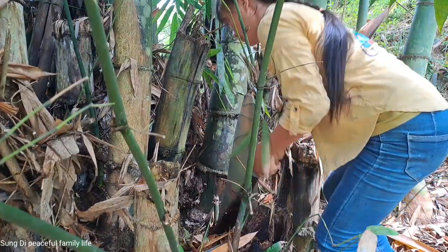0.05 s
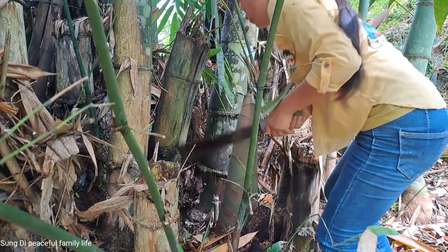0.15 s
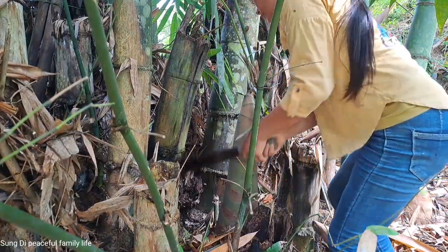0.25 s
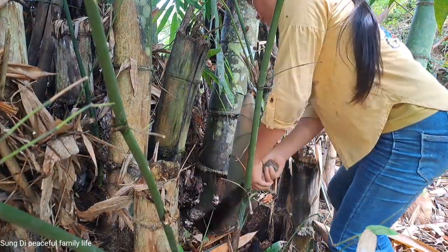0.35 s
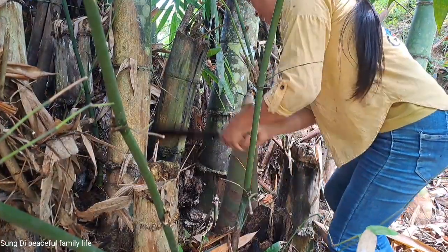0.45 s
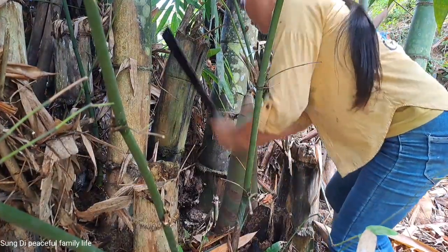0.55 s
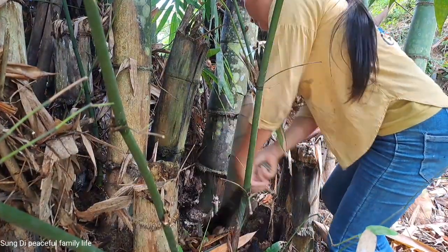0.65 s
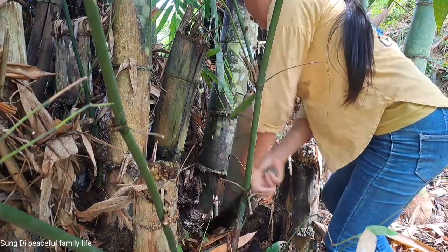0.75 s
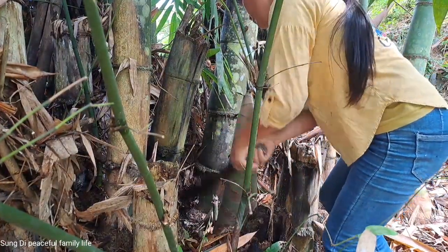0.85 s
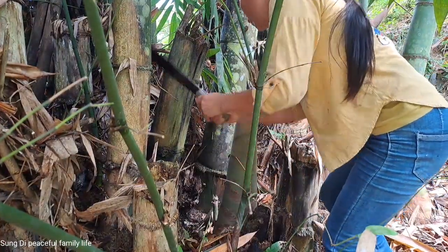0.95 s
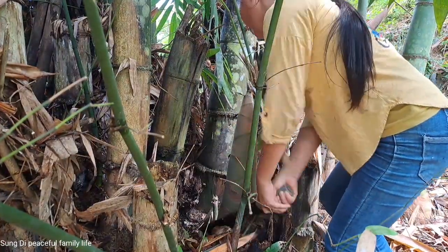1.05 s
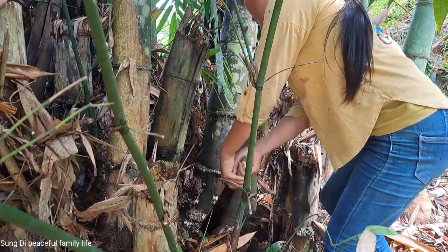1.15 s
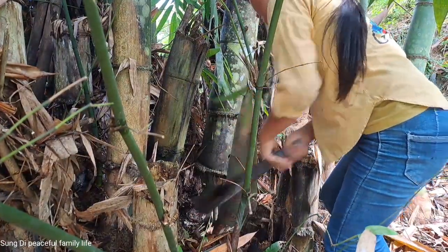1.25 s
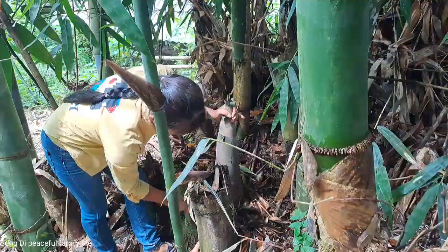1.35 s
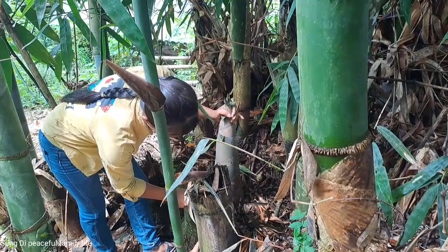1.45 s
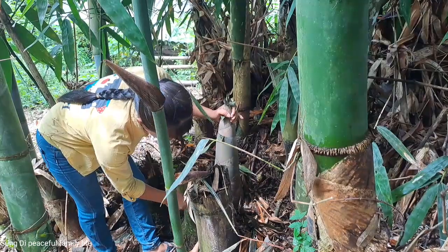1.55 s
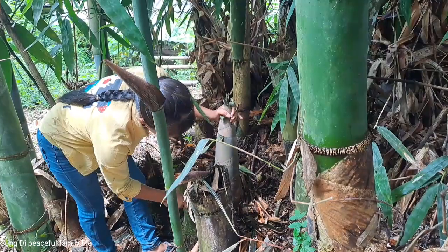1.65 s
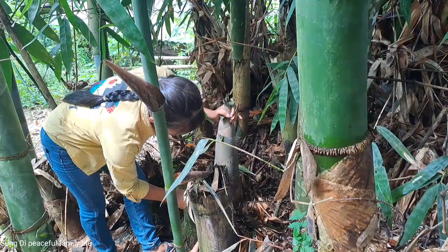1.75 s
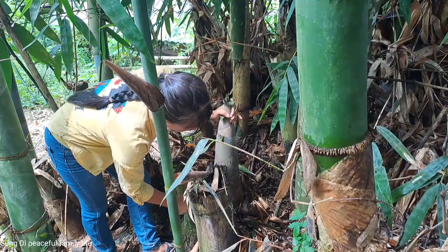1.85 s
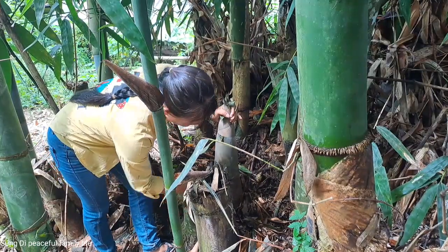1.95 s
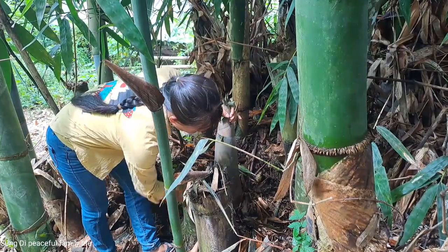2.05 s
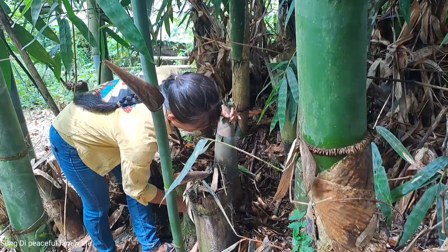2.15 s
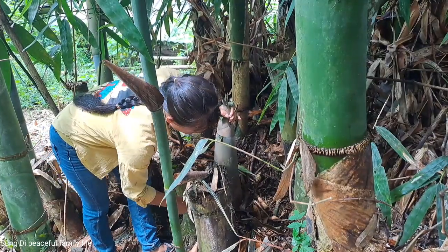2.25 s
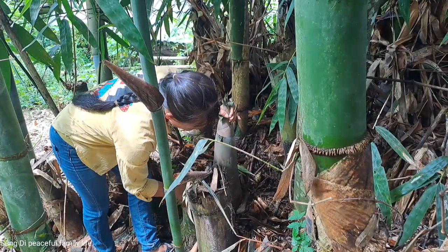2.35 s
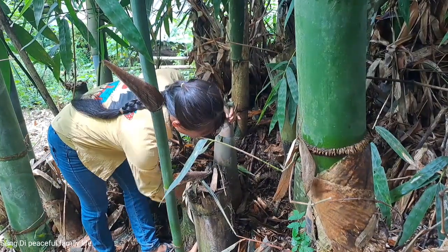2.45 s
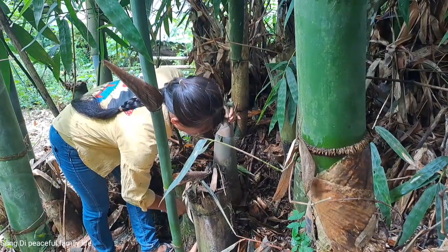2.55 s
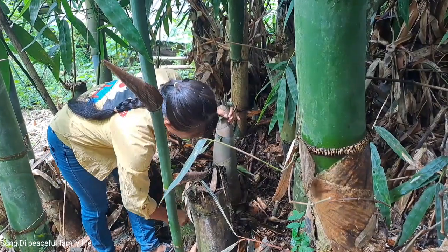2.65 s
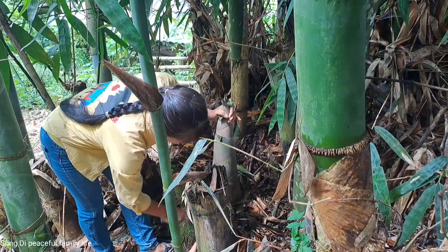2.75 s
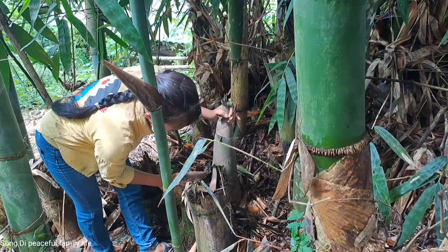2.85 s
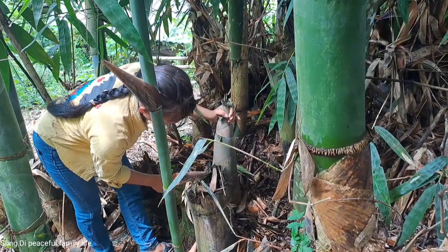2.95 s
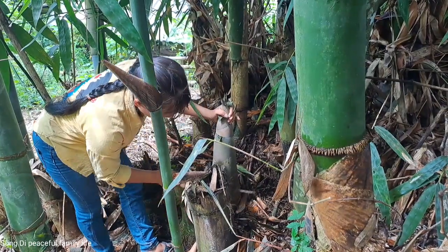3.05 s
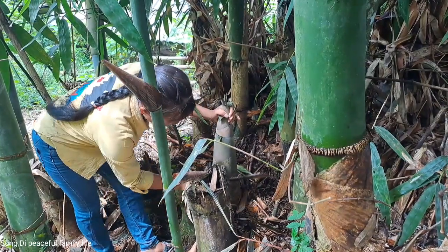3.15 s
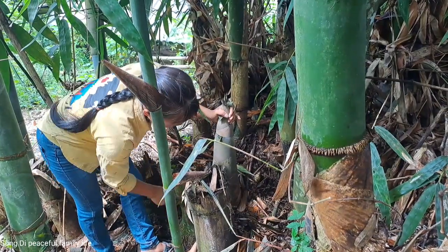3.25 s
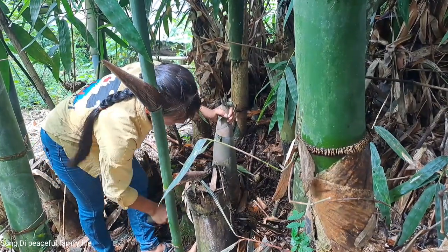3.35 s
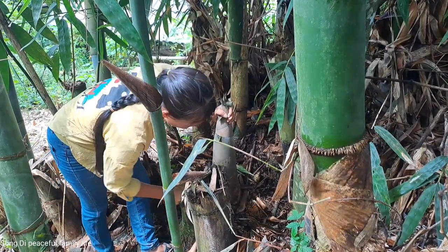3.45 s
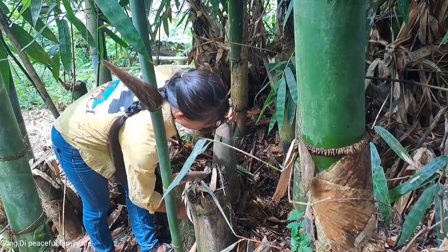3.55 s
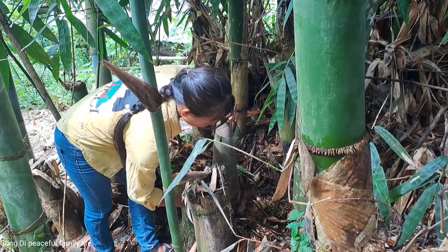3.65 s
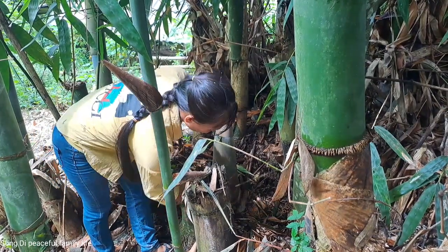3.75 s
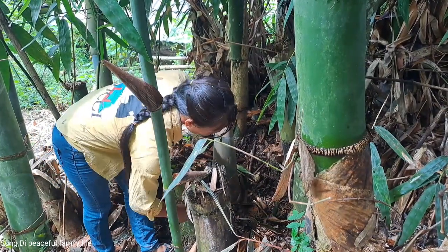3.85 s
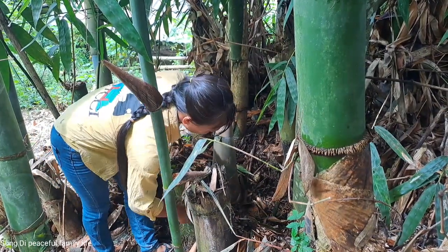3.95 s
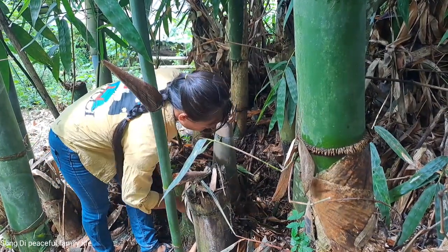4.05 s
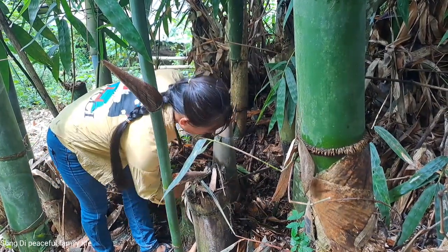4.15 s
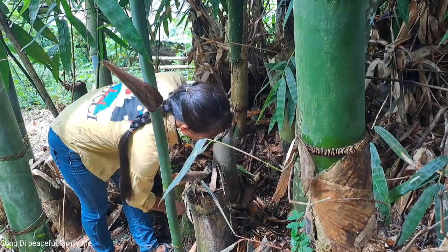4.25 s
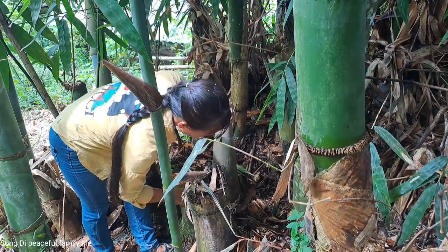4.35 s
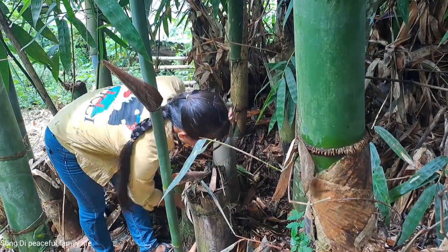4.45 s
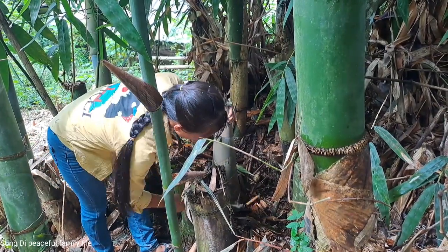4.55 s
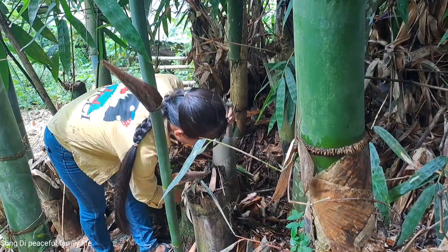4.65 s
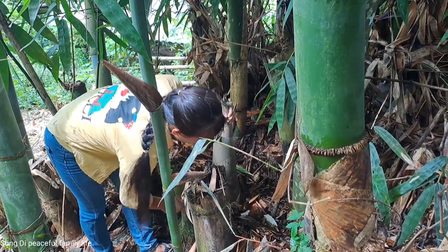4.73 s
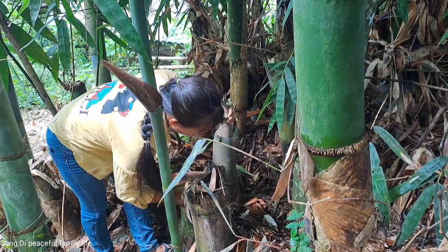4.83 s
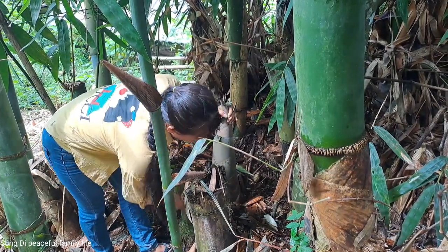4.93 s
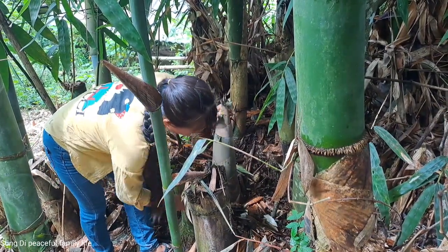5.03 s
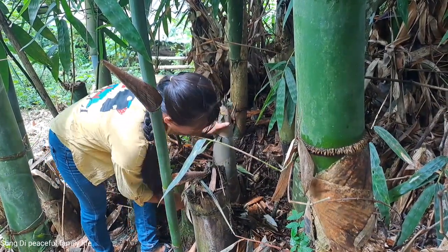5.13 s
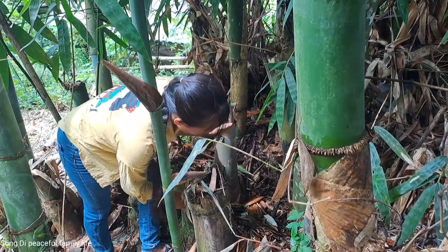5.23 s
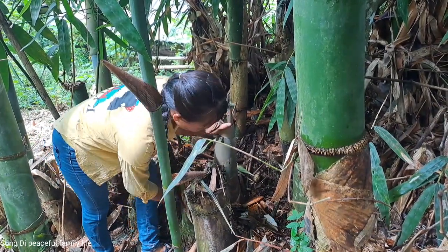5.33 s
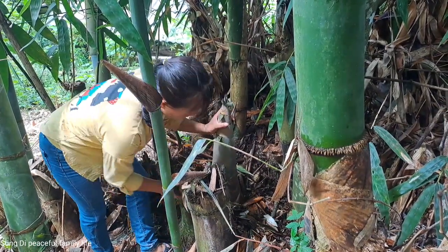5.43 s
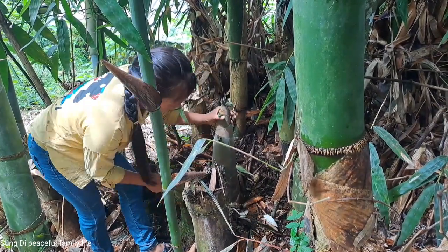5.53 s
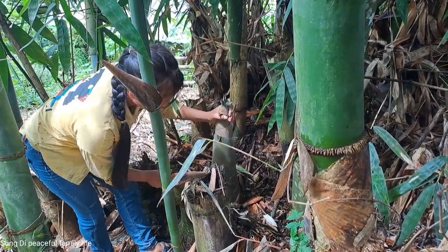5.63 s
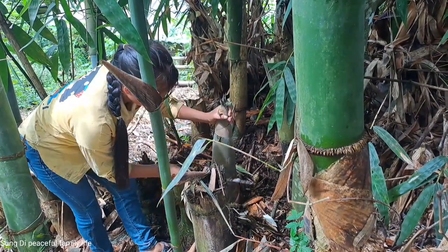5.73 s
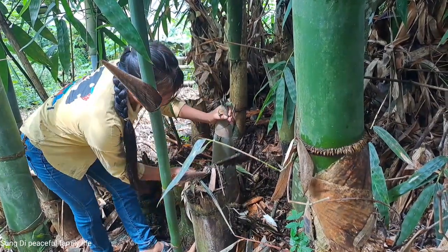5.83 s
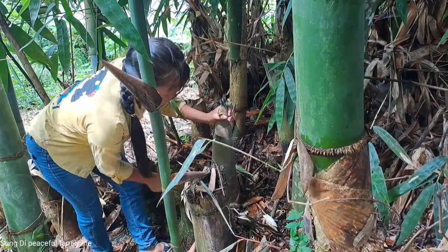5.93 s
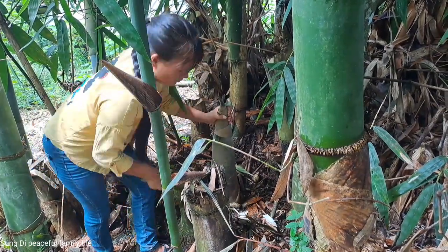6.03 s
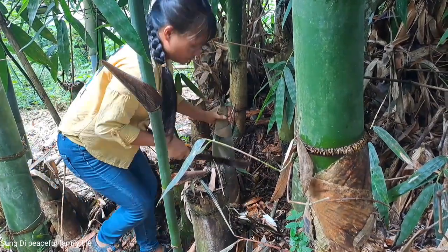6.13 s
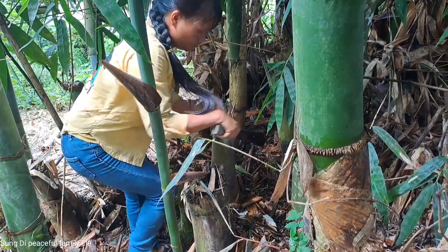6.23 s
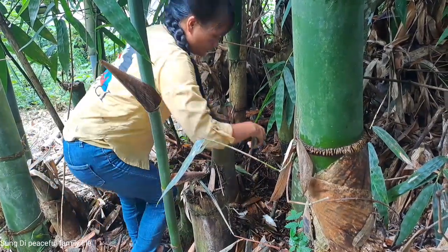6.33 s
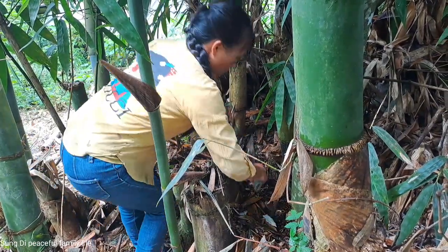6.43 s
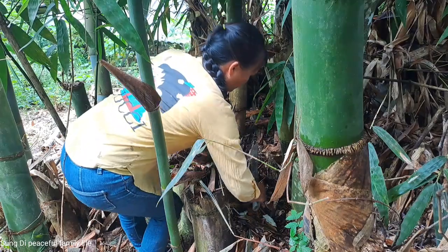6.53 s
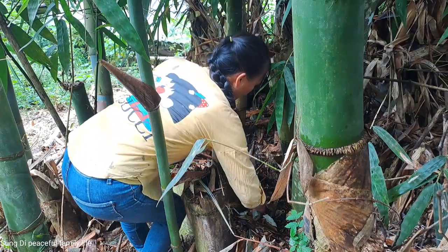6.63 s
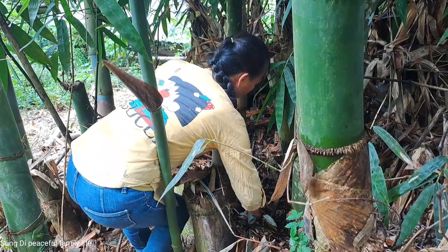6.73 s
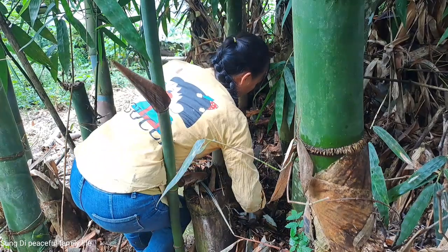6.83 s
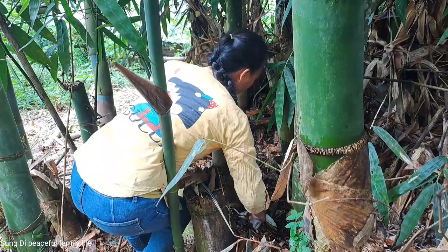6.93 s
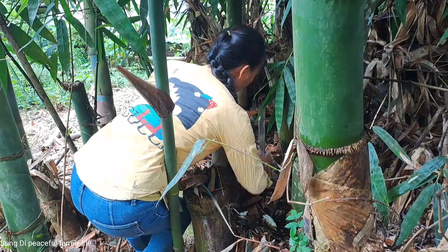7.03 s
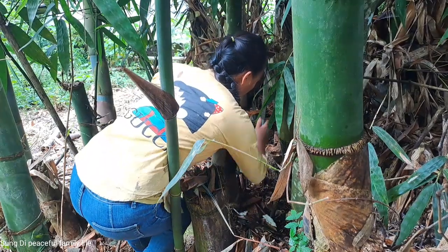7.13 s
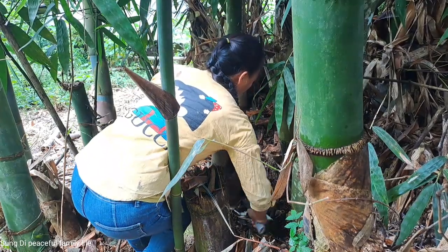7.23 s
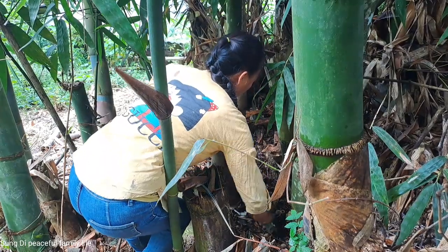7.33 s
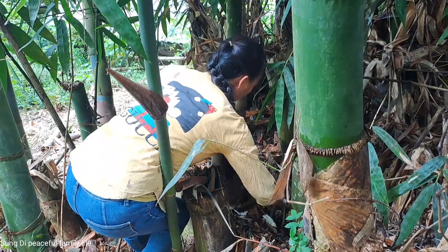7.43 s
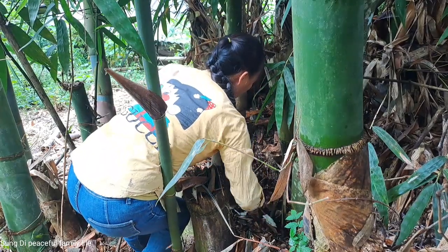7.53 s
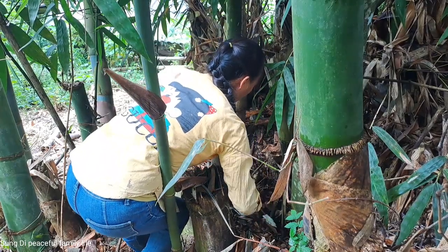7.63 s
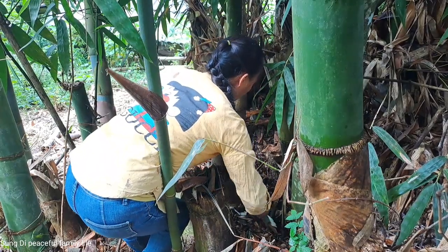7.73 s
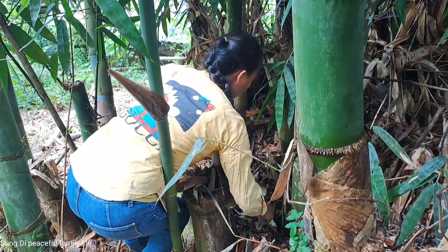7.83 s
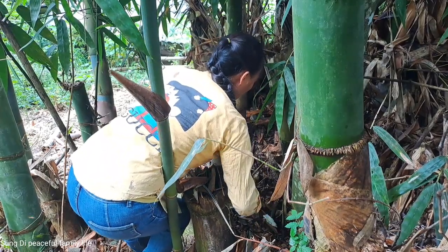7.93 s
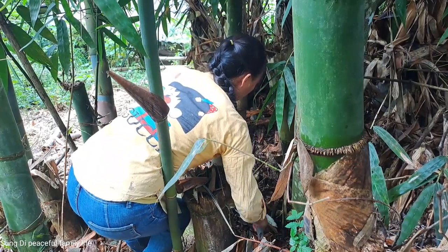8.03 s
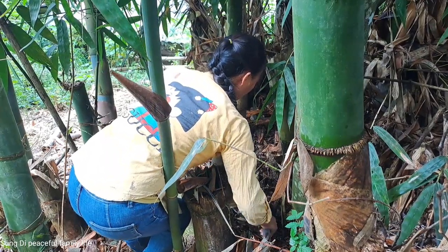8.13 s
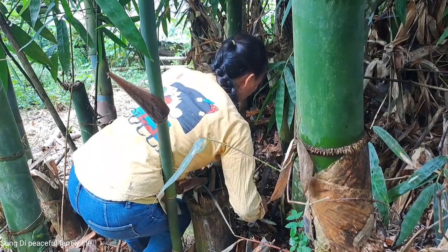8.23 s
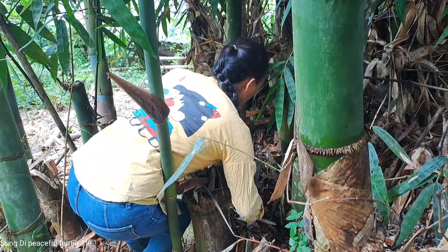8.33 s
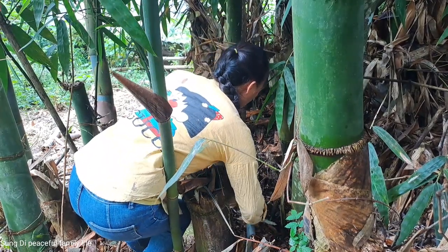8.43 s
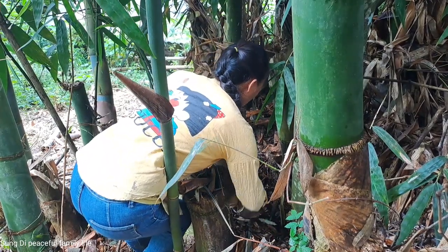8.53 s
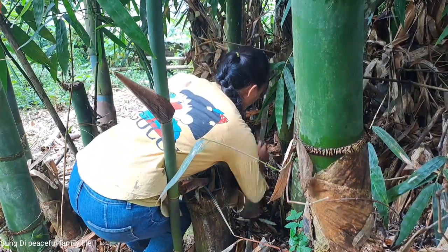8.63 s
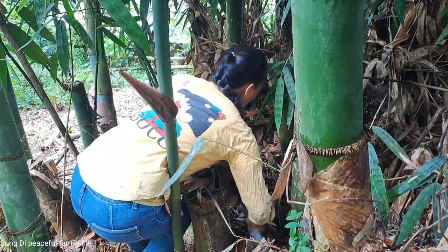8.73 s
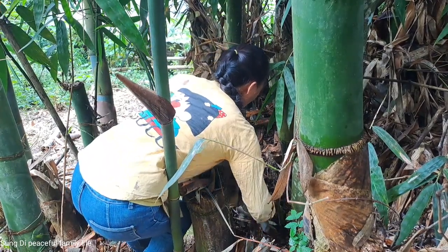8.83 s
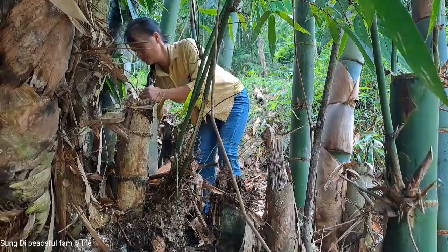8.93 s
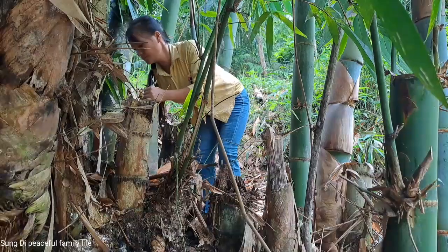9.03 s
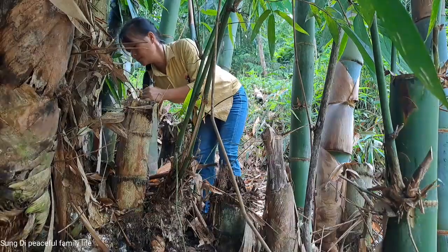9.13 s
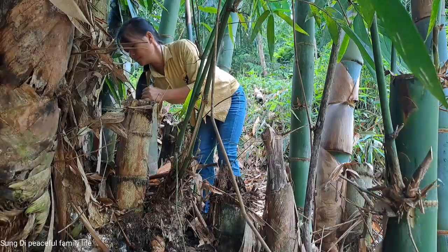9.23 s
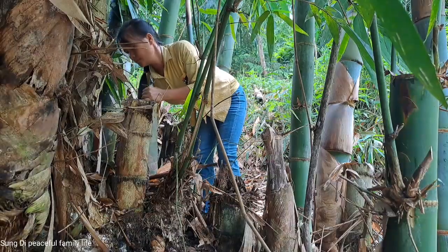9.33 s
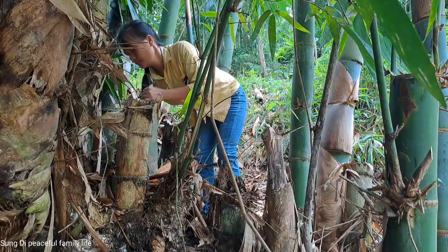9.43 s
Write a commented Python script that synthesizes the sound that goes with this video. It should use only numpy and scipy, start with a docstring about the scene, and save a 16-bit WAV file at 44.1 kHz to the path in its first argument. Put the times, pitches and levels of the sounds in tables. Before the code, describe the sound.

In an outdoor bamboo grove, a shrill insect buzz throbs high and steady over a soft distant hush. An insect rasps briefly within the first 0.7 s as sheaths brush. Close, hard blade blows crack at about 0.7 and 1.1 s, with weaker knocks between, splitting fibres and thudding low into the root. More strong chops fall at 2.2, 2.6 and 3.3 s, then a quick run from 3.9 to 5.0 s, and one near 6.0. Leaves rustle and splinters patter, especially around 6.4 and 7.5 s. A sharp hit lands at 7.3, smaller knocks and scrapes follow, a stump rings dully at 8.2, and a last strong chop comes at 8.8. Wind buffets the microphone from about 7.4 to 9 s. A small bird repeats hoarse falling calls, mostly from 1.4 to 6.2 s; a cricket chirps from 1.8 to 8.9. Insects remain at the end, joined by a slower buzz.

```python
"""Chopping bamboo shoots in a grove

A heavy blade bites at the foot of bamboo shoots: noise bursts for fibres, rough tones for knock and thud.
Dry sheaths and leaf litter rustle and snap, made of shaped noise and short pitched grains.
Insects buzz high above in throbbing noise bands, a cricket chirps in phrases and another insect rasps briefly.
A small bird repeats a falling call of hoarse gliding tones over the far hush of the grove.
A light wind, low lumpy noise, buffets the two microphone ports and swells into one gust."""
import sys
import numpy as np
from scipy import signal
from scipy.fft import rfft, irfft, next_fast_len
from scipy.io import wavfile
from scipy.ndimage import map_coordinates

SR = 44100
rng = np.random.default_rng(int(sys.argv[2]) if len(sys.argv) > 2 else 0)


def log_audio(samples):
    """Write samples as a 16-bit WAV file to the path given in sys.argv[1]."""
    # one column per channel
    frames = np.atleast_2d(samples).T
    # limit to full scale, then quantise
    limited = np.clip(frames, -1, 1)
    pcm = np.round(limited * 32767).astype(np.int16)
    wavfile.write(sys.argv[1], SR, pcm)


def volts(x):
    """Linear amplitude factor 10**(x/20) for a level x in dB, scalar or array-like."""
    e = np.asarray(x, float) / 20
    return 10 ** e


N = 418068

# colour of splitting fibres and dry leaves: [f/Hz, relative level/dB]
FIBRES = [(500, -26), (1200, -5), (2800, 0), (4000, -1), (9500, -3), (12500, -71)]
# how alike near sounds are at the two ports: [f/Hz, left-right correlation]
NEAR_LIKENESS = [(300, 0.36), (1000, 0.91), (2000, 0.24), (5000, 0.061)]


def unit(x):
    """Scale to rms 1."""
    return x / np.sqrt(np.mean(x ** 2) + 1e-20)


def along(points, hz):
    """Read a curve of (f/Hz, value) points on a log frequency axis."""
    f, v = np.transpose(points)
    return np.interp(np.log(hz + 1), np.log(f + 1), v)


def curves(rows):
    """One value per sample for each column after the time."""
    s, *cols = np.transpose(rows)
    return [np.interp(np.arange(N) / SR, s, c) for c in cols]


def wobble(rate):
    """A smooth random curve with rate knots a second."""
    knots = rng.standard_normal(int(N * rate / SR) + 4)
    return map_coordinates(knots, [np.arange(N) * rate / SR])


def filtered(x, response):
    """Filter x by a complex response of frequency."""
    m = next_fast_len(N + SR // 2)
    return irfft(rfft(x, m) * response(np.fft.rfftfreq(m, 1 / SR)), m)[..., :N]


def rush(spectrum, alike):
    """Coloured stereo noise of rms 1; the mid-side balance sets the likeness of the ports."""
    def mid_side(hz):
        angle = np.arccos(np.clip(along(alike, hz), -1, 1)) / 2
        return volts(along(spectrum, hz)) * [np.cos(angle), np.sin(angle)]
    mid, side = filtered(rng.standard_normal((2, N)), mid_side)
    return unit(np.array([mid + side, mid - side]))


def crackle(rate):
    """Stereo grains of rms 1: dry splinters, each a few cycles at its own pitch and place."""
    when, pitch, size, side = rng.random((4, int(rate * N / SR), 1))
    k = np.arange(256)
    cycles = 2000 * 4.5 ** pitch * k / SR  # 2 to 9 kHz
    loudness = (size + 0.0033) ** -.45  # a few grains stand out
    grains = loudness * np.sin(2 * np.pi * cycles) * np.exp(-cycles / 2.5)
    at = ((when * N).astype(int) + k).ravel()
    ports = [np.bincount(at, (grains * gain).ravel(), N)[:N] for gain in (.5 + side, 1.5 - side)]
    return unit(np.array(ports))


def panned(db):
    """Left and right gains for a level difference, positive to the left."""
    return np.array([volts(db / 2), volts(-db / 2)])


def add(track, s, sound):
    """Mix a sound into a track at a time in seconds."""
    i = max(round(s * SR), 0)
    track[..., i:i + sound.shape[-1]] += sound[..., :N - i]


def resonant(x, modes):
    """Sum of causal resonances of alternating sign, given as (f/Hz, width/Hz, level/dB)."""
    def response(f):
        return sum((-1) ** k * volts(db) * 1j * f * w / (c * c - f * f + 1j * f * w)
                   for k, (c, w, db) in enumerate(modes))
    return filtered(x, response)


def rough_tone(hz, samples, rough):
    """A sine whose phase takes random steps (rough, in rad a sample), so its pitch is unsteady."""
    return np.sin(np.cumsum(2 * np.pi * hz / SR + rough * rng.standard_normal(samples)))


def far_grove():
    """The distant hush: a broad noise whose level wanders slowly."""
    # colour of the far grove: [f/Hz, relative level/dB]
    hush = [(90, -29.5), (150, -0.5), (1500, -21.5), (2500, -5), (3900, -19.5), (5300, -3), (6600, -10),
            (11000, -61.5)]
    return volts(-73.5 + 1.7 * wobble(1.894)) * rush(hush, [(150, 0.68), (600, 0.63), (2000, 0)])


def litter():
    """Dry leaves underfoot rustle as noise and crackle as grains, in uneven clumps."""
    # rustle of the leaves: [t/s, level/dB]
    leaves = [(0.0, -69.5), (0.3, -82.5), (1.9, -87), (2.3, -67), (2.55, -86), (2.75, -64), (2.98, -86.5),
              (6.1, -70.5), (6.4, -63), (6.6, -75.5), (7.47, -60.5), (7.63, -76), (8.95, -71), (9.05, -89)]
    level_db, = curves(leaves)
    clumps = unit(volts(4.5 * wobble(30)))
    return volts(level_db) * clumps * (rush(FIBRES, NEAR_LIKENESS) + .45 * crackle(600))


def wind():
    """Lumpy low noise, partly different on each port; a breeze grows into one long gust."""
    # colour of the buffeting: [f/Hz, relative level/dB]
    low_noise = [(20, -44), (85, 2.5), (190, -7.5), (600, -72.5)]
    # single buffets in the gust: [t/s, level/dB before a 3 dB cut]
    bumps = [(7.668, -46), (7.795, -44.5), (7.854, -47), (8.102, -46), (8.882, -47)]
    # the breeze rises 1 dB/s, then the gust swells, holds and drops away: (t/s, level/dB)
    gust = [(0, -84), (6.78, -77.14), (7.48, -58), (8.94, -58), (8.996, -78.5)]
    level_db, = curves(gust)
    own_lumps = np.array([wobble(16), wobble(16)])
    lumps = volts(5.5 * wobble(20) + 3.5 * own_lumps)
    level = volts(level_db) * unit(lumps)
    t = np.arange(SR // 10) / SR
    for s, db in bumps:
        add(level, s, volts(db - 3) * np.sin(np.pi * np.minimum(t / 0.039, 1)))
    return level * rush(low_noise, [(40, .1), (200, .6)])


def insects():
    """Noise bands throbbing at the wing-stroke rate, over a broad lower choir; a slower one joins late."""
    # buzz levels: [t/s, high level/dB, high left-right difference/dB, lower choir level/dB]
    buzz = [(0.0, -52, 0, -64), (0.63, -55, 0, -66), (4.99, -56.5, -6, -63), (5.73, -54, -4.5, -62),
            (8.97, -54.5, -3.5, -64), (9.02, -56.5, 1, -65.5)]
    # colour of the high buzz: [f/Hz, relative level/dB]
    high_band = [(11800, -36), (13500, -16), (14100, -6), (14340, 0), (14600, -6), (15200, -12),
                 (15600, -22), (15800, -90)]
    # colour of the lower choir: [f/Hz, relative level/dB]
    choir_band = [(5000, -28.5), (9600, -9.5), (10500, -3.5), (11200, -8), (15500, -31.5), (15800, -86)]
    # bands of the slower neighbour: [entry t/s, f/Hz, width/Hz, level/dB]
    neighbour = [(9.13, 14280, 150, -60), (9.22, 13600, 350, -63)]
    strokes_hz, slow_strokes_hz = 48.7, 40.3  # the first drifts around its rate
    high_db, pan_db, choir_db = curves(buzz)
    t = np.arange(N) / SR
    throb = np.cos(2 * np.pi * np.cumsum(strokes_hz * (1 + 0.035 * wobble(1.4))) / SR)
    depth_db = np.array([[1.3], [2.8]])  # deeper on the right
    high = unit(volts(depth_db * throb + 1.2 * wobble(8))) * rush(high_band, [(14000, .05)])
    choir = volts(1.8 * wobble(4.6)) * rush(choir_band, [(10000, 0.025)])
    slow_throb = unit(volts(3.6 * np.cos(2 * np.pi * slow_strokes_hz * (t - 9.132))))
    late = np.zeros((2, N))
    for s, hz, width, db in neighbour:
        fade_in = np.clip((t - s) / 0.036, 0, 1)
        band = [(hz - 2 * width, -40), (hz, 0), (hz + 2 * width, -40)]
        late += volts(db) * fade_in * rush(band, [(hz, .5)])
    return volts(high_db) * panned(pan_db) * high + volts(choir_db) * choir + slow_throb * late


def rasp():
    """Quick scrapes of a toothed wing: noise pulsed tooth by tooth, each scrape with a sudden stop."""
    # scrapes: [t/s, length/s]
    scrapes = [(0.032, 0.064), (0.118, .05), (0.208, 0.054), (0.572, 0.074)]
    centre_hz, reach_hz, teeth_hz = 10850, 3500, 191
    t = np.arange(N) / SR
    gate = sum((t > s) * (t < s + length) for s, length in scrapes)
    teeth = np.sin(np.pi * teeth_hz * t) ** 4
    band = [(centre_hz - reach_hz, -50), (centre_hz, 0), (centre_hz + reach_hz, -50)]
    return volts(-57.5) * gate * teeth * rush(band, NEAR_LIKENESS)


def strike(rise, t60):
    """Envelope of a blow: a rounded rise (s), then a decay of 60 dB in t60 (s)."""
    t = np.arange(SR // 3) / SR
    return (1 - np.exp(-(t / rise) ** 2)) * volts(-60 * t / t60)


def brushes(bite, treble, knock, rattle):
    """Strokes through dry sheaths: short swells of noise with a very rough knock."""
    # brushes: [t/s, level/dB, decay to two sigma/s, knock f/Hz]
    strokes = [(0.163, -53.5, 0.024, 1080), (0.287, -56, 0.0057, 1502), (1.164, -51.5, 0.089, 2615),
               (1.275, -61.5, 0.069, 2657), (1.357, -51.5, 0.028, 1940), (2.752, -53.5, 0.04, 2670),
               (2.863, -58, 0.04, 2000), (3.333, -51, 0.061, 1900), (4.19, -65, 0.016, 2015),
               (5.551, -59.5, 0.039, 700), (5.694, -62, 0.057, 3000), (5.912, -62, 0.024, 2187),
               (6.193, -60, 0.026, 2380), (6.366, -59.5, 0.041, 3600), (6.733, -60.5, 0.057, 1076),
               (7.441, -62, 0.14, 2470), (7.533, -58, 0.07, 2360), (7.589, -58, 0.054, 2406),
               (7.803, -46.5, 0.025, 2115), (7.838, -51.5, 0.1, 2060), (7.872, -44, 0.01, 1998),
               (8.099, -51.5, 0.022, 1204), (8.117, -45, 0.05, 2987)]
    t = np.arange(SR // 3) / SR
    for s, db, length, hz in strokes:
        sigma = np.where(t < .006, .002, length / 2)
        stroke = np.exp(-.5 * ((t - .006) / sigma) ** 2)
        stroke = stroke * rattle[round(s * SR):][:len(t)]
        add(bite, s, volts(db) * stroke)
        add(treble, s, volts(db - 2) * stroke)
        add(knock, s, volts(db) * stroke * rough_tone(hz, len(t), 0.19))


def blows(bite, treble, chips, shove, knock, rattle):
    """The edge splits fibres in a burst, knocks the hollow stem, then thuds down into the root."""
    # blows: [t/s, bite level/dB, thud level/dB, knock level/dB, knock f/Hz]
    chops = [(0.4302, -41, -46.5, -34, 358), (0.6825, -17, -33.5, -21, 1242),
             (0.8904, -34.5, -61.5, -37, 2930), (1.1322, -17, -30.5, -17, 1083),
             (1.6581, -37.5, -57.5, -38, 2348), (1.9044, -28.5, -45, -37.5, 477),
             (2.1591, -18, -43.5, -25, 1770), (2.5732, -16, -45.5, -23.5, 1880),
             (3.04, -39, -50.5, -33, 2020), (3.2805, -18, -35.5, -20, 1280), (3.644, -26.5, -49, -53, 2860),
             (3.8866, -14.5, -41.5, -18, 2674), (4.3018, -20, -39, -20, 1860),
             (4.5552, -18, -38, -25.5, 2640), (4.7891, -19, -37, -29.5, 580),
             (5.024, -20, -38.5, -27, 2415), (5.9674, -20.5, -43.5, -22, 1883),
             (6.9819, -38.5, -55.5, -44.5, 1520), (7.2055, -44.5, -48.5, -43, 1050),
             (7.2768, -15, -34.5, -24.5, 2040), (7.4922, -33, -49, -40, 810),
             (7.9008, -32.5, -45.5, -27.5, 2390), (8.163, -24.5, -42.5, -23.5, 1304),
             (8.501, -35.5, -56.5, -43.5, 1315), (8.7724, -18, -33.5, -18.5, 2257)]
    t = np.arange(SR // 3) / SR
    for s, db, thud_db, knock_db, hz in chops:
        # chips fall, shaken leaves answer
        tail = volts(-26) * strike(0.0085, 0.2) * rattle[round(s * SR):][:len(t)]
        add(bite, s - .006, volts(db - 23) * strike(0.0047, 0.055))  # the edge first slices the loose sheath
        add(bite, s - .001, volts(db) * (strike(0.0018, 0.023) + tail))
        # treble dulls by 0.28 dB for each dB of knock over the bite
        treble_db = db - 4.5 - 0.28 * (knock_db - db)
        add(treble, s - .001, volts(treble_db) * (strike(0.002, 0.034) + tail))
        add(chips, s, volts(db - 40) * strike(.01, .45))  # splinters keep dropping
        add(shove, s, volts(thud_db + 24) * (strike(0.0013, 0.034) + volts(-27.0) * strike(0.0011, 0.22)))
        # wet wood has no steady pitch
        add(knock, s, volts(knock_db) * strike(0.0011, 0.02) * rough_tone(hz, len(t), 0.079))
        root_hz = 152 if s < 1.4 else 118  # the thud lies lower from 1.4 s on
        sinking_hz = root_hz * (1 + 1.3 * np.exp(-t / .011))  # sinks as the root takes the load
        add(knock, s, volts(thud_db) * strike(0.008, 0.15) * rough_tone(sinking_hz, len(t), 0.062))
        # the stem's lowest note
        add(knock, s, volts(thud_db + 6.5) * strike(0.0055, 0.05) * rough_tone(344, len(t), 0.047))


def stump(knock):
    """A cut stump rings once: decaying sines that sag in pitch."""
    # ringing modes: [starting f/Hz, level/dB, t60/s]
    modes = [(249.6, -35, 0.18), (1310, -73, 1)]
    t = np.arange(SR // 2) / SR
    for hz, db, t60 in modes:
        envelope = volts(db - 60 * t / t60) * (1 - np.exp(-t / 0.018))
        add(knock, 8.165, envelope * np.sin(2 * np.pi * hz * (t - 0.035 * t ** 2)))


def chopping():
    """Blows and brushes share spiky fibre noise; the blows also drop splinters and shove a resonant hollow
    stem, and a stump rings once."""
    # treble colour of the fibres: [f/Hz, relative level/dB]
    fibre_treble = [(6000, -35), (9000, -5.5), (10200, 1.5), (14900, -1.5), (16600, -30.5)]
    # upper resonances of the hollow stem: [f/Hz, width/Hz, level/dB]
    stem = [(545, 166, -4), (1064, 220, -7)]
    bite, treble, chips, shove, knock = np.zeros((5, N))
    rattle = unit(volts(3 * wobble(300)))  # dry sheaths and chips tap unevenly
    blows(bite, treble, chips, shove, knock, rattle)
    brushes(bite, treble, knock, rattle)
    stump(knock)
    snaps = volts(3 * wobble(900))  # fibres give way one after another
    wood = resonant(shove * snaps * rng.standard_normal(N), stem) + knock
    later = np.roll(wood, 2)  # the right port is a little farther: two samples
    split = bite * rush(FIBRES, NEAR_LIKENESS) * panned(np.array([1.5]))
    split = split + treble * rush(fibre_treble, NEAR_LIKENESS)
    return snaps * split + chips * crackle(900) + np.array([wood, later])


def falling_note(hz, fall, length):
    """A hoarse tone gliding down by the fraction fall of hz over its length (s)."""
    t = np.arange(SR // 6) / SR
    swell = np.sin(np.pi * np.minimum(t / length, 1) ** 1.1)
    return swell * rough_tone(hz * (1 + fall * (.5 - t / length)), len(t), .095)


def bird():
    """Two hoarse falling notes, the first higher, now and then one long slide, blurred by the grove."""
    # calls: [t/s, just after the notes begin; reference level/dB]
    calls = [(1.405, -53), (1.715, -53.5), (2.017, -52), (2.53, -56.5), (2.826, -52), (3.114, -52),
             (3.45, -50), (3.85, -54.5), (4.211, -56), (4.535, -55), (4.94, -52.5), (5.759, -52),
             (6.199, -57), (9.456, -58.5)]
    # longer, lower slides: [t/s, level/dB before the grove blur]
    slides = [(1.246, -55), (5.234, -58), (8.69, -56)]
    upper_hz, call_hz, slide_s = 7550, 5620, .115
    out = np.zeros(N)
    for s, db in calls:
        add(out, s - .07, volts(db - 8) * falling_note(upper_hz, .07, .04))
        # the drop between them
        add(out, s - .055, volts(db - 8) * falling_note((upper_hz + call_hz) / 2, .3, .025))
        add(out, s - .045, volts(db - 5) * falling_note(call_hz, 0.07, 0.06))
    t = np.arange(SR // 6) / SR
    halfway_break = np.abs(np.cos(np.pi * t / slide_s)) ** .5
    for s, db in slides:
        add(out, s, volts(db) * falling_note(4880, .16, slide_s) * halfway_break)
    # a quarter second of decaying noise scatters the call
    echo = rng.standard_normal((2, SR // 4)) * volts(-60 * np.arange(SR // 4) / SR / 0.25)
    echo = echo / np.linalg.norm(echo[0])
    return .6 * out + signal.fftconvolve(out[None], echo, axes=1)[:, :N]


def cricket():
    """Each chirp is six wing strokes, pulses of one high rough tone."""
    # phrases: [middle of first chirp t/s, number of chirps]
    phrases = [(1.825, 5), (2.49, 3), (2.95, 1), (3.055, 2), (3.533, 5), (4.165, 1), (4.28, 1), (4.525, 4),
               (5.075, 1), (5.21, 1), (5.615, 5), (6.058, 1), (6.431, 7), (7.337, 5), (8.075, 4),
               (8.675, 3)]
    chirp_s, tone_hz, strokes_hz = .0733, 10050, 180
    out, t = np.zeros(N), np.arange(SR // 20) / SR
    pulses = np.maximum(np.sin(2 * np.pi * strokes_hz * t), 0) ** 2
    strokes = pulses * np.sin(np.pi * np.minimum(t / 0.034, 1)) ** 0.21
    for first, chirps in phrases:
        for s in first + chirp_s * np.arange(chirps):
            level = volts(rng.normal(-54.0, 1.8))
            add(out, s - .018, level * strokes * rough_tone(tone_hz, len(t), 0.068))
    return out * panned(np.array([-3.5]))[:, None].reshape(2, 1)


def scene():
    """All sources over the far hush of the grove."""
    return far_grove() + litter() + wind() + insects() + rasp() + chopping() + bird() + cricket()


def top_cut(x):
    """Nothing passes above the cut-off."""
    return signal.sosfilt(signal.butter(12, 16520, fs=SR, output="sos"), x)


def record(dry):
    """The microphone cuts the deep bass in three 40 Hz slopes; nothing passes from 16.5 kHz up."""
    mix = filtered(dry, lambda hz: (1j * hz / (40 + 1j * hz)) ** 3 * (hz < 16500))
    return top_cut(mix)


dry = scene()
out = record(dry)
log_audio(out)
```